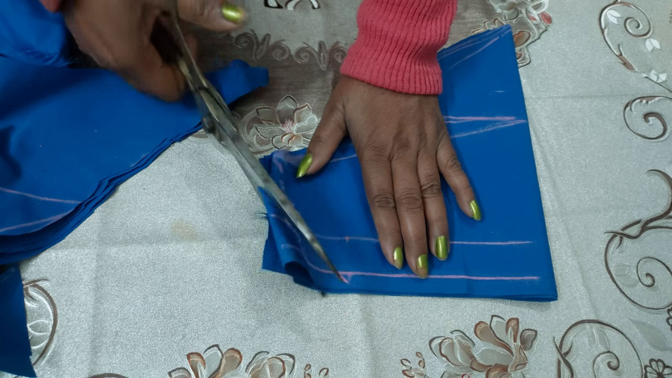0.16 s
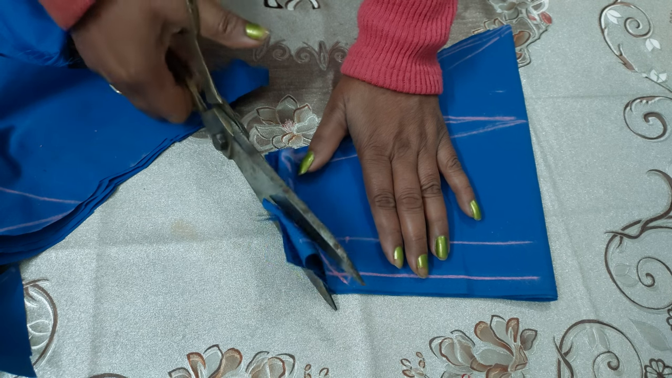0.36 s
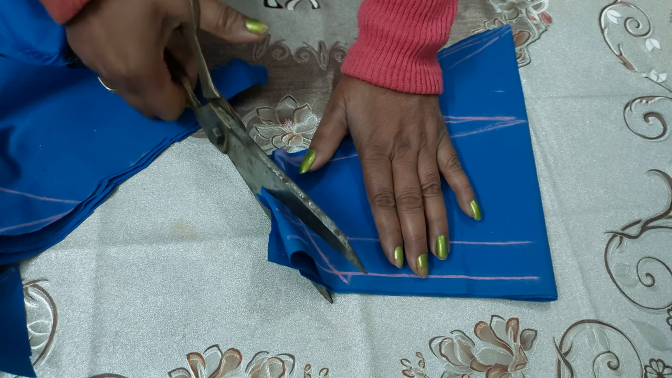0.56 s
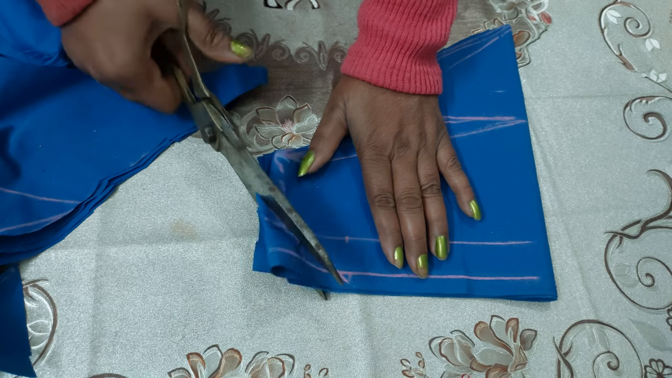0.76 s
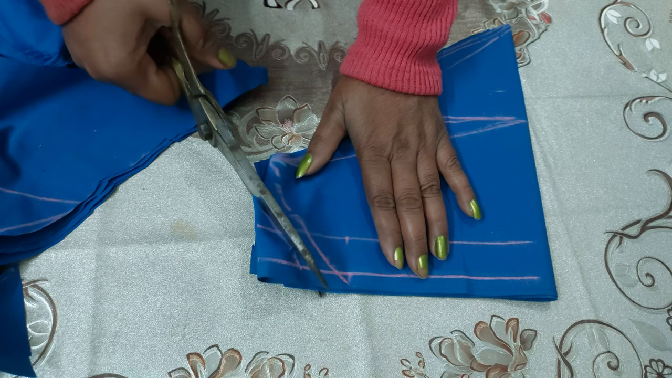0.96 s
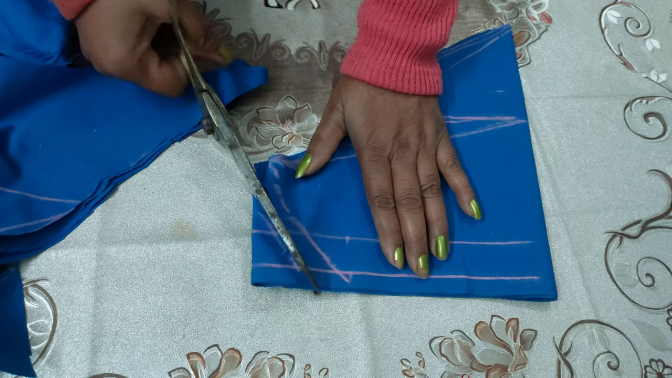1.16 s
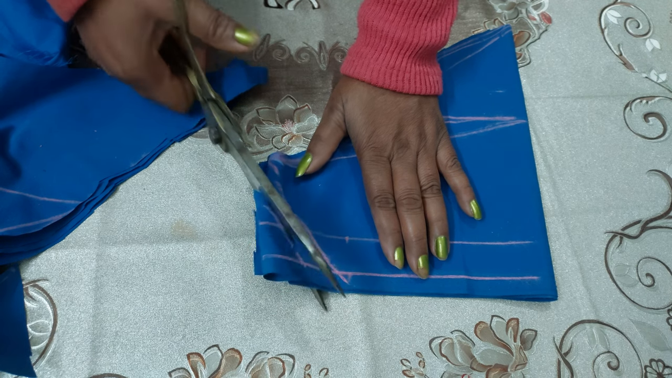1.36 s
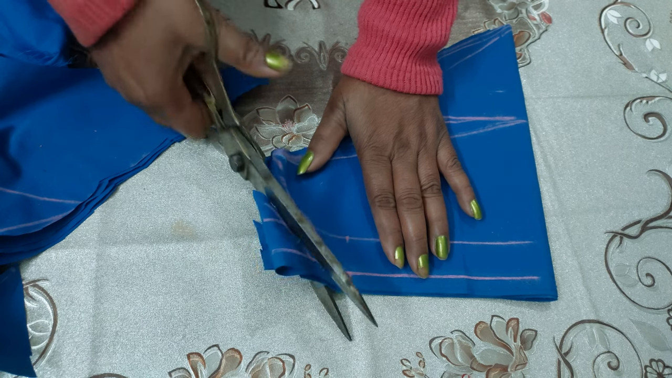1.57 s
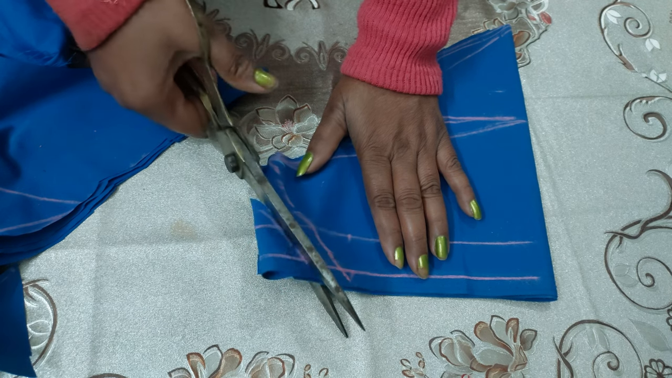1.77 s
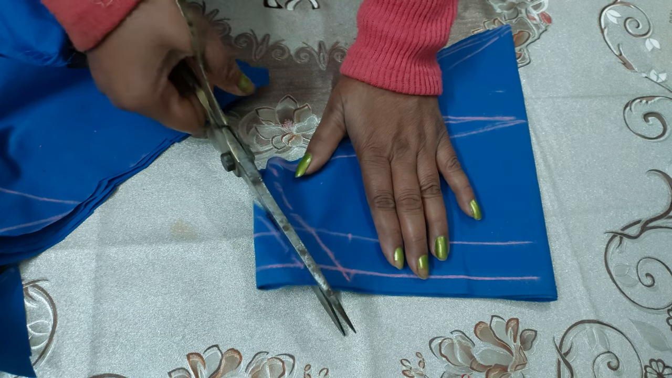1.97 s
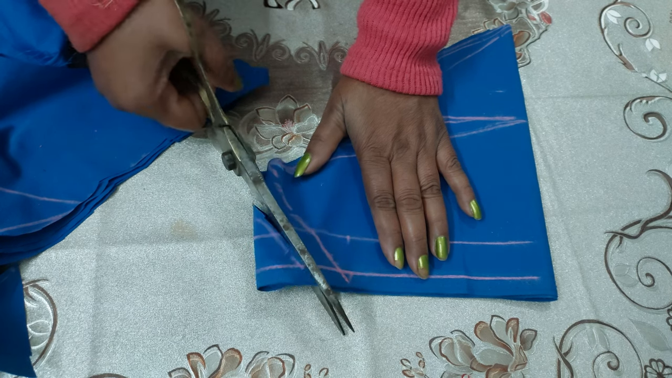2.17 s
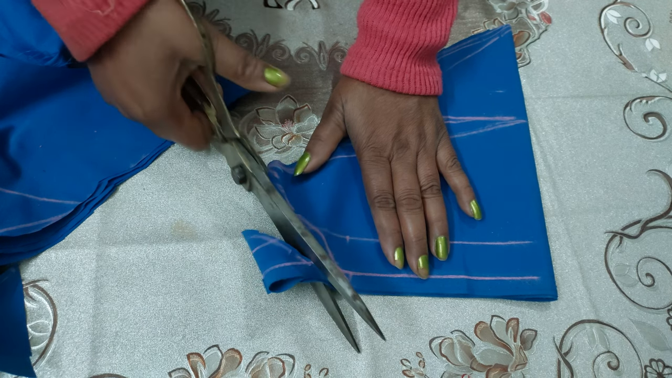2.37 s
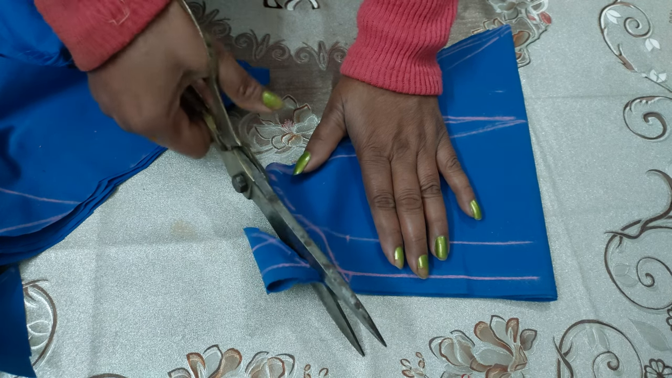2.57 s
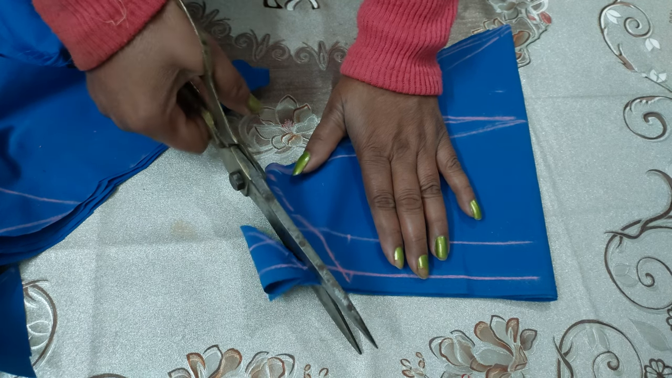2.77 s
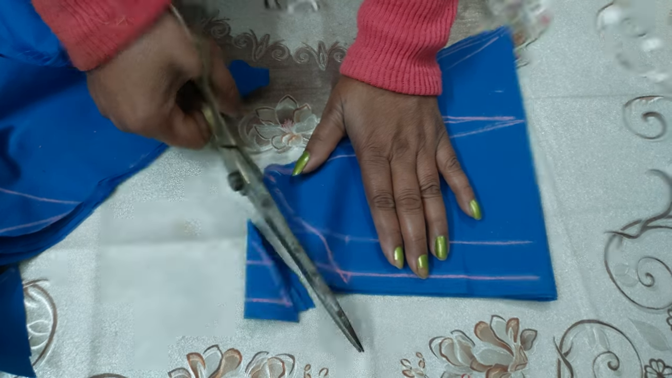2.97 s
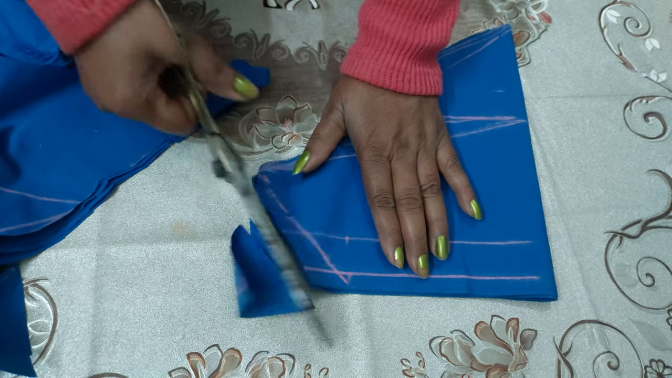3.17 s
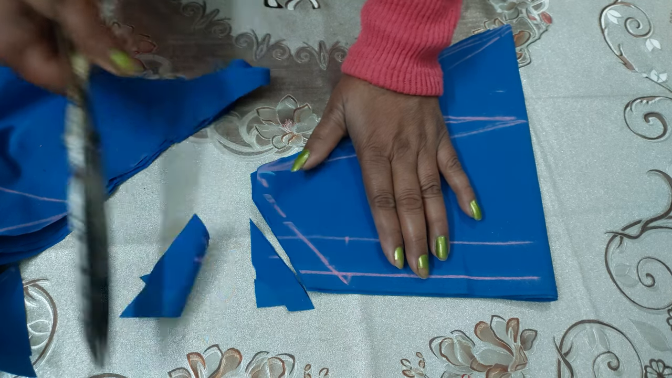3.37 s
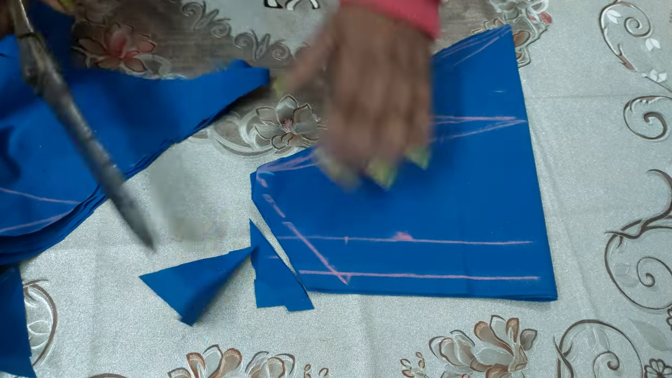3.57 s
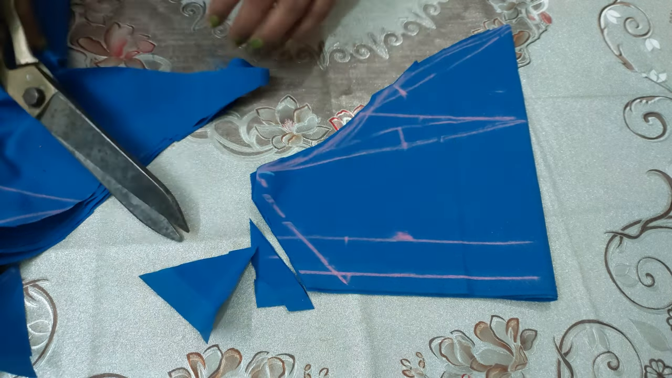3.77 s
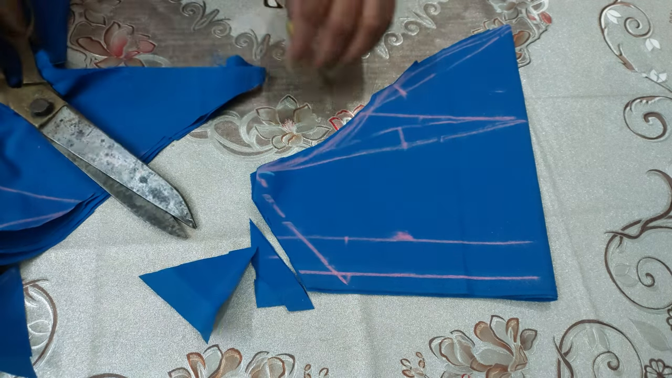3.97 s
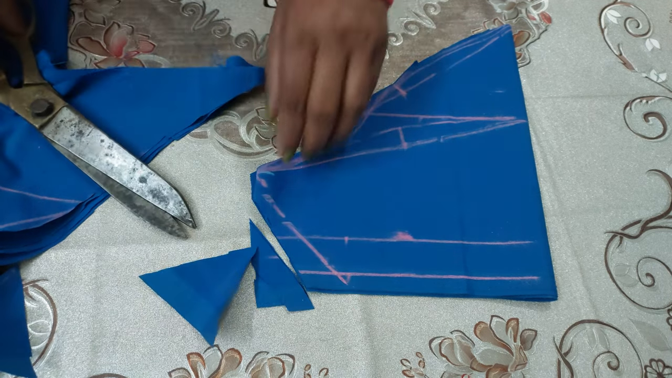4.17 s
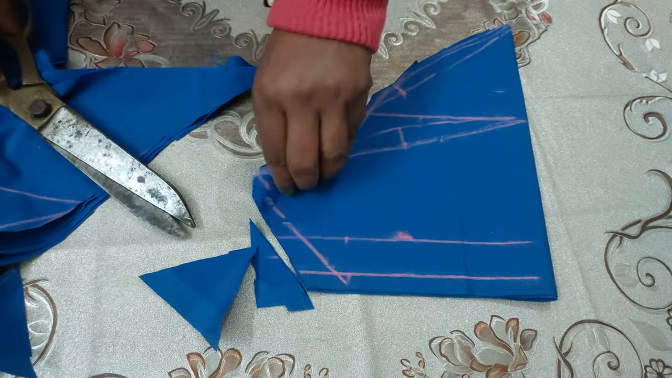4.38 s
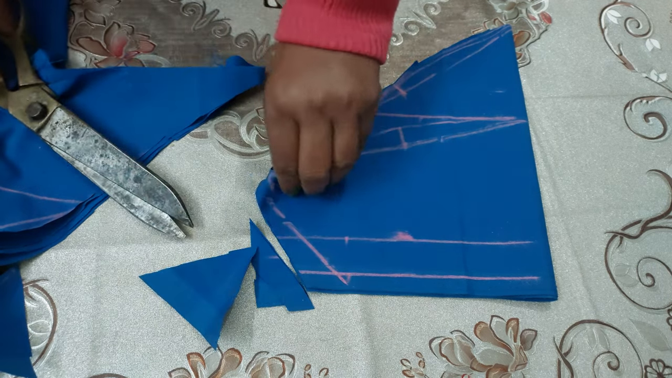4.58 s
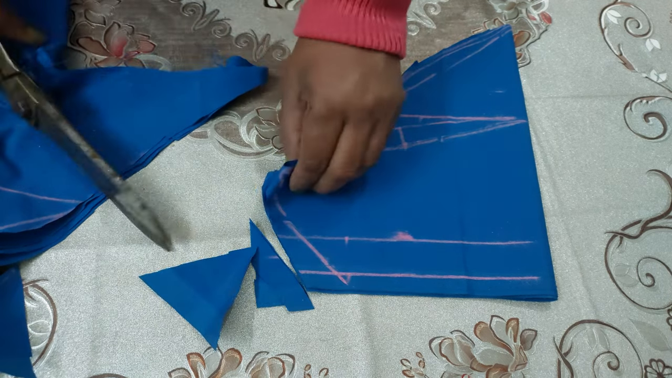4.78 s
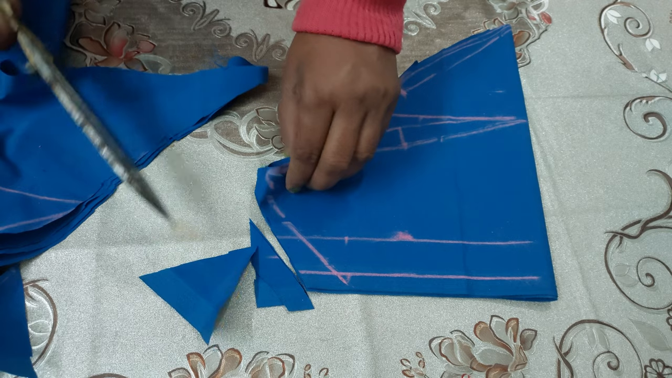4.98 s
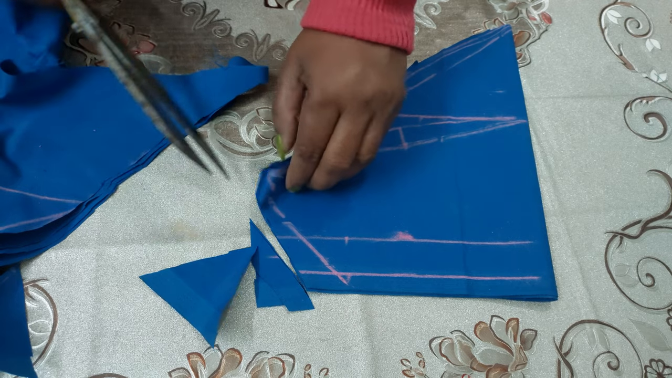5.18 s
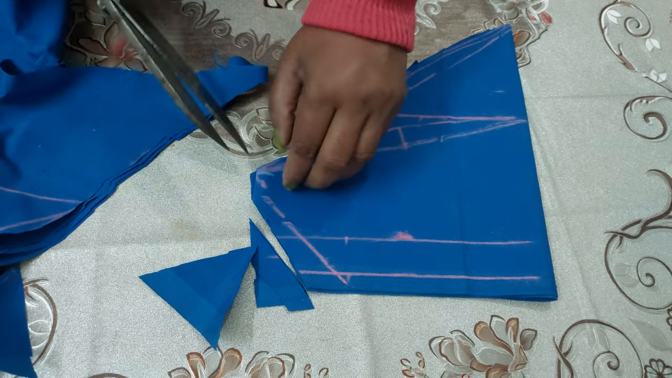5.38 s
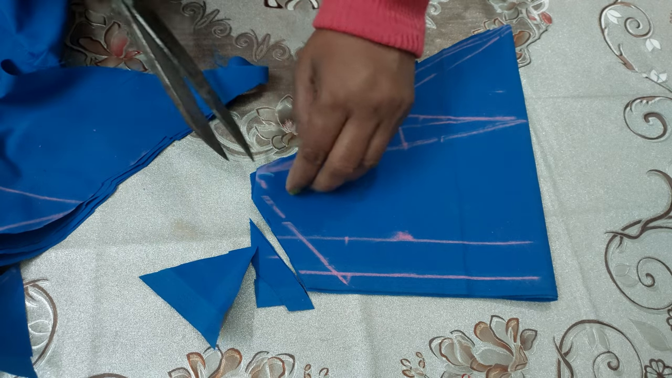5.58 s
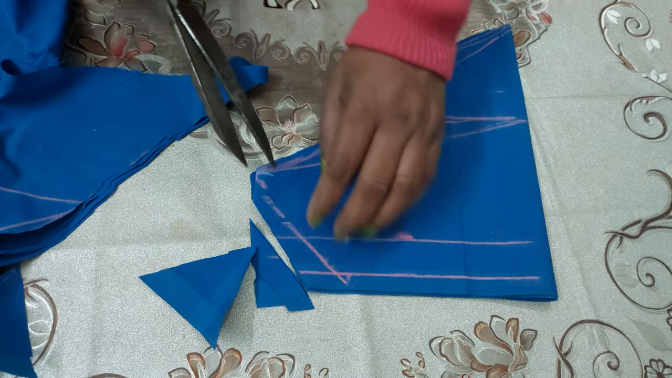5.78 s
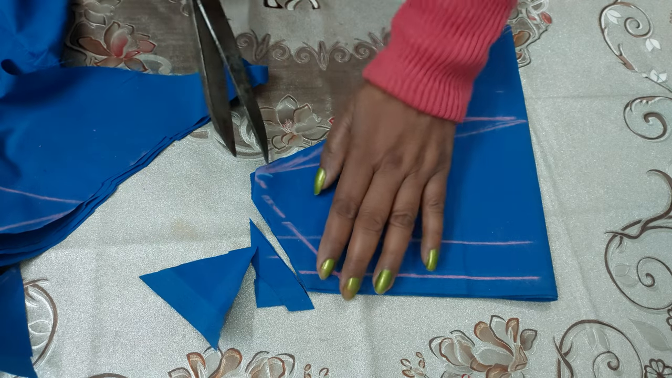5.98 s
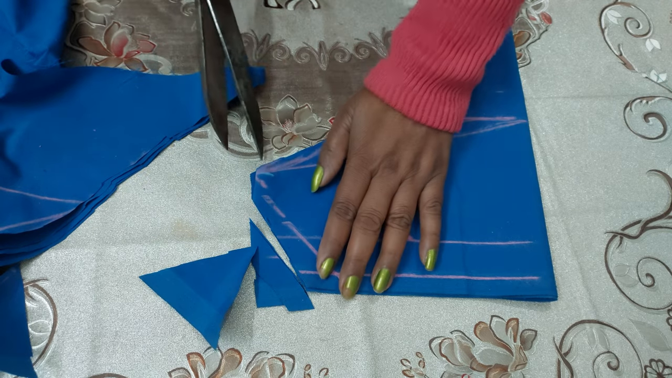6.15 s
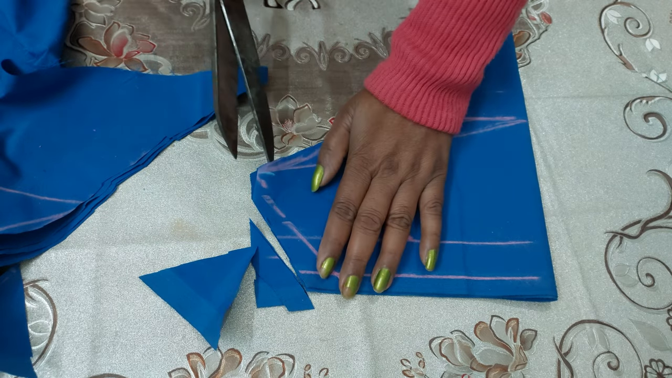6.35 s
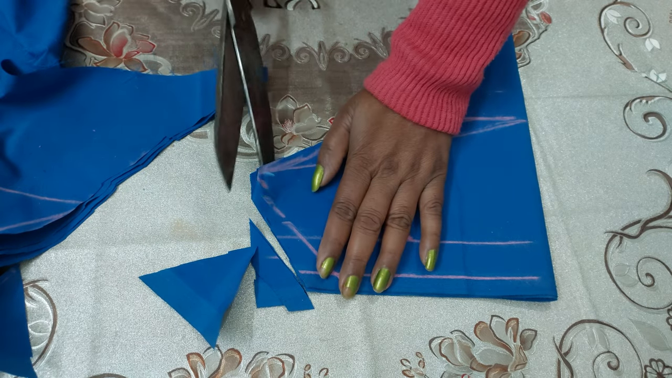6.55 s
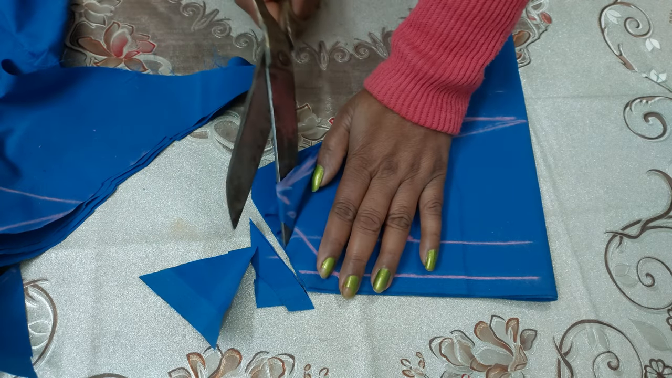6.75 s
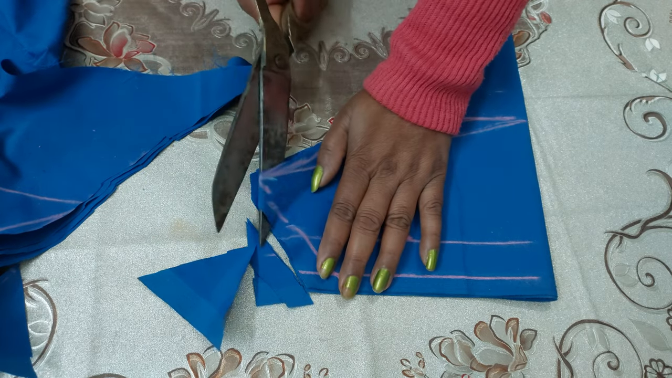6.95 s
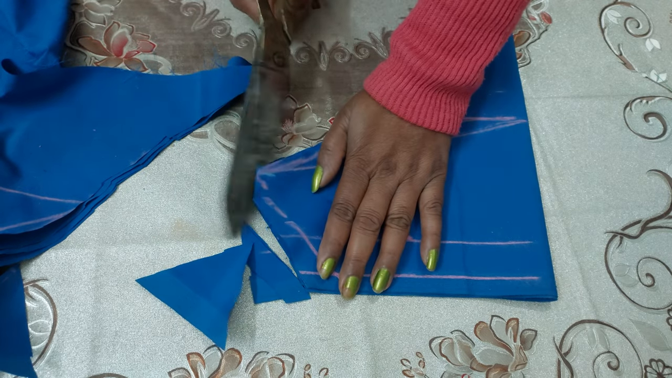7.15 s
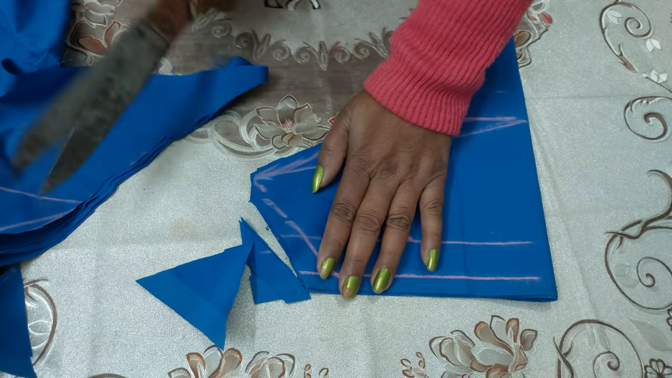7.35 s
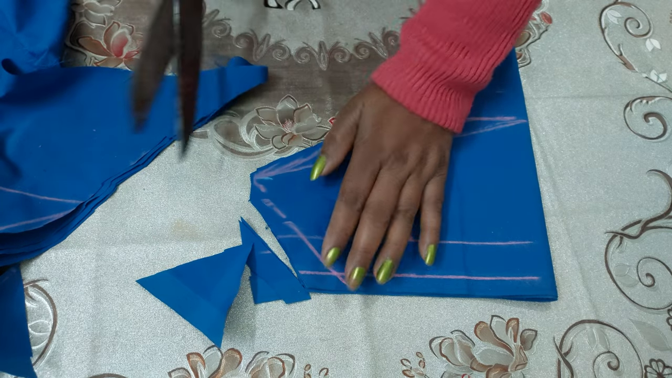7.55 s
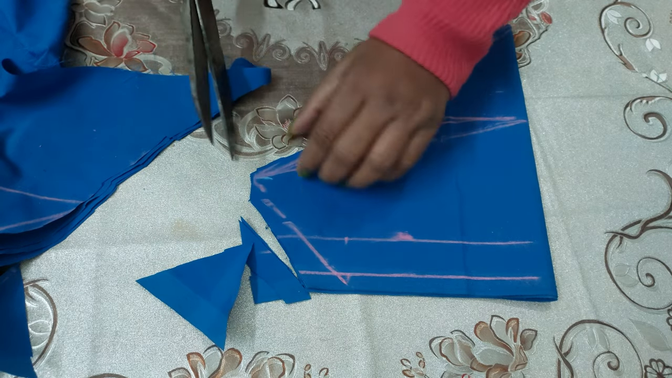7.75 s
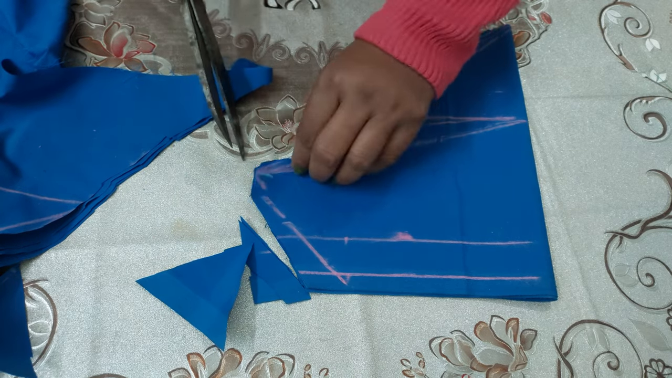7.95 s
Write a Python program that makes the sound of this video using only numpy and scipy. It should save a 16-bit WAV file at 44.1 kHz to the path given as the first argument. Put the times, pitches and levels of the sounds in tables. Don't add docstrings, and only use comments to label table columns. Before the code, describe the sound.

Close-up fabric cutting: gritty blade scrapes and low table thumps, one loud closing snap, a set-down knock, then quiet cloth slides and small steel ticks.

```python
import sys
import numpy as np
from scipy import signal
from scipy.fft import rfft, irfft, next_fast_len
from scipy.io import wavfile
from scipy.ndimage import uniform_filter1d, map_coordinates

SR = 44100
rng = np.random.default_rng(int(sys.argv[2]) if len(sys.argv) > 2 else 0)


def materialize(psi):
    bounded = np.clip(np.atleast_2d(psi).T, -1, 1)
    quanta = np.round(bounded * 32767).astype(np.int16)
    wavfile.write(sys.argv[1], SR, quanta)


def ratio_of_db(decibels):
    return 10 ** (np.asarray(decibels, float) / 20)


N = 353682

# frequency in [Hz], level in [dB per Hz].
HUM_HZ_DB = [(15, -65), (25, -27), (92, -10.5), (127, -13.5), (153, -6.5), (223, -9), (263, -1.5),
             (317, -11.5), (531, -10), (695, -13), (1740, -20.5), (2690, -37.5), (10400, -49.5),
             (12900, -46), (16000, -46)]
# frequency in [Hz], correlation [-1 to 1].
ALIKE_HZ = [(60, 0.82), (180, 0.92), (550, 0.58), (1650, -0.19), (4970, -0.46), (15000, -0.14)]
# frequency in [Hz], t60 in [s].
ROOM_HZ_T60_S = [(100, 0.65), (1000, 0.54), (5000, 0.41), (14000, 0.19)]
# frequency in [Hz], level in [dB], t60 in [s], excitation group [0-4, rounded].
TABLE_MODES = [(90.2, 2.5, 0.3, 4), (104.4, 3, 0.31, 0.5), (159.7, 1, 0.33, 1), (202, 2, 0.22, 2.2),
               (275.8, 7.5, 0.13, 2), (300, 10.5, 0.15, 2), (319, 2.5, 0.036, 2), (412, -10, 0.21, 2),
               (510, -16, 0.17, 3), (634, 2, 0.096, 3), (685, -5, 0.083, 3), (826, -13, 0.076, 2.2),
               (1012, -24, 0.022, 3.9), (1145, -4.5, 0.051, 3), (1281, -18, 0.12, 3), (1470, -18, 0.012, 1),
               (1773, -20.5, 0.088, 3)]
# frequency in [Hz], width in [Hz], level in [dB].
BLADE_MODES = [(3000, 300, -0.5), (3560, 220, 11), (3720, 480, -1), (5500, 130, -5), (6700, 55, -29),
               (7100, 420, -26), (7190, 76, 4.5), (10500, 120, -10.5), (11400, 160, -1), (12560, 700, 9.5),
               (14300, 840, -2)]
# frequency in [Hz], width in [Hz], level in [dB].
SING_BANDS = [(3500, 720, -1), (5600, 600, -2.5), (7550, 510, 0.5)]
# frequency in [Hz], level in [dB per Hz].
CLOTH_HZ_DB = [(880, -22.5), (1500, -29), (1790, -8), (2560, -15), (3520, -25.5), (4120, -20),
               (5440, -13.5), (8490, -20), (11200, -17.5), (16000, -23)]
# start in [s], length in [s], effort in [dB], bite into thread in [dB],
# weight on the table in [dB].
STROKES = [(0.0, 0.12, -66, -3.5, 22.5), (.11, 0.15, -64, 0.5, 21.5), (.69, 0.081, -71.5, -2, 29.5),
           (1.008, 0.09, -50, -1, 21), (1.3, 0.096, -63, -9, 20), (1.38, 0.17, -58.5, -9.5, 13),
           (1.6, 0.35, -67.5, -10, 26), (1.84, 0.032, -58.5, -7, 26), (1.985, 0.093, -59, -5, 29.5),
           (2.284, 0.033, -62, -12, 19), (2.36, 0.12, -70.5, -7, 19.5), (2.51, 0.32, -70.5, -8, 26),
           (2.7, 0.14, -63.5, -13, 28.5), (2.957, 0.012, -50, 1.5, 26.5), (3.1, 0.19, -69.5, -7.5, -1)]
# start in [s], length in [s], speed in [dB], crispness in [dB],
# weight on the table in [dB].
SLIDES = [(.25, 0.34, -76, -13, 24.5), (.58, 0.14, -78, -10.5, 30.5), (.77, 0.32, -65, -10.5, 25.5),
          (.86, 0.16, -55, -3, 22.5), (3.3, 0.27, -69.5, -8.5, 2), (3.55, 0.38, -70.5, -0.5, -9),
          (3.75, 0.29, -65.5, -4, 18.5), (4.1, 0.33, -73, -11, -2), (4.27, 0.27, -65, -10, 20.5),
          (4.65, 0.39, -67, -5, 15), (4.79, 0.1, -62.5, -3, 16), (5.05, 0.15, -65, -9, 8.5),
          (5.5, 0.84, -66.5, -6.5, 13.5), (6.49, 0.48, -64, -7, 13.5), (6.62, 0.19, -67, 4, 7),
          (6.78, 0.13, -64, 2.5, -6), (6.9, 0.22, -65.5, -10, 11.5), (7.12, 0.2, -59.5, -5, 10.5),
          (7.37, 0.33, -72, -6, 15), (7.8, 0.33, -65, -11, 17)]
# start in [s], peak in [dB], place toward the middle in [dB],
# hardness in [dB].
BUMPS = [(0.017, -34, 1, -5.5), (0.038, -24, -12, -10), (0.105, -35, -9, -2), (0.154, -16, -16, -10),
         (0.632, -37, -14, -17), (0.673, -29, -9, -10), (0.717, -33, -5, -1), (0.896, -26.5, -3.5, -6),
         (0.997, -28.5, -19, -1), (1.066, -22.5, -6, 0), (1.081, -17.5, -15, -9), (1.106, -23.5, -8, 3.5),
         (1.308, -30, -17, -2), (1.328, -23, -17, -25), (1.394, -41.5, -10, 5), (1.425, -19, -22, -16),
         (1.683, -26.5, -13, -14), (1.841, -17.5, -10, -12), (1.861, -22.5, -4, -7),
         (1.987, -16, -18, -11.5), (2.026, -17, -7, -7.5), (2.13, -25.5, -1.5, -7.5), (2.267, -38, 2, -16),
         (2.516, -19.5, -5, -25.5), (2.708, -29.5, 5, -9), (2.818, -27.5, 7, -9), (2.959, -26, 6.5, -1),
         (2.9725, -10.5, -1, -6.5)]
# start in [s], peak in [dB], place in [dB], hardness in [dB],
# freedom to ring [x t60].
SLAMS = [(2.9842, -9.5, 2.5, -13.5, 0.48), (3.7478, -15.5, -12.5, -3, 1.4), (4.3, -20, -14, -11.5, 1.3),
         (4.785, -34.5, -18, -13, 2.1), (6.361, -38.5, -9, -8, 1.2), (6.537, -27, -21, -17.5, 1.3),
         (7.097, -39.5, -14, -18.5, 2.2), (7.904, -41.5, -1, -3, 1.9)]
# start in [s], peak in [dB], brightness in [dB], swell in [s].
RUBS = [(0.032, -54.5, -21, 0.022), (0.1104, -37, -13, 0.0076), (0.696, -47.5, 3.5, 0.011),
        (0.713, -50, -12, 0.012), (1.376, -42.5, -18, 0.012), (1.6786, -44.5, -6.5, 0.0096),
        (2.287, -58, -15, 0.0058), (2.545, -52, -20, 0.004), (2.5765, -45, -10, 0.0051)]
# start in [s], peak in [dB], brightness in [dB], ring in [Hz].
BITES = [(0.6747, -50.5, -12, 7700), (0.738, -50, -13, 7650), (1.03, -40.5, -6, 5600),
         (1.121, -35, -18, 5500), (1.886, -51, -9, 3500), (2.005, -41, -15, 5200), (0.856, -49, -25, 2960),
         (0.889, -39.5, -7, 5600), (0.9294, -46, -13.5, 3500), (0.9624, -42, -14, 3080),
         (0.9986, -46, -5, 3540), (1.0143, -35.5, -7, 3500), (1.065, -37, -1, 5500),
         (1.105, -34, -11, 5600), (1.3084, -57, -22, 7500), (1.321, -54, -22, 5800),
         (1.4744, -49, -4, 4800), (1.656, -49.5, -3.5, 5470), (1.839, -38, -8, 3570),
         (1.838, -43, -10, 6000), (1.988, -41, -10, 5200), (2.078, -44, -10, 7500), (2.112, -44, -10, 6400),
         (1.862, -42, -3, 3470), (1.988, -33, -9, 3470), (2.0145, -40, -8, 3740), (2.0256, -36.5, -4, 3560),
         (2.0448, -35.5, -12, 3500), (2.075, -37, -14, 3100), (2.111, -41, -3, 3500),
         (2.127, -47, -6, 3450), (2.708, -46, -6, 3400), (2.762, -39, -6, 3470), (2.815, -42.5, -4, 3400),
         (2.834, -33.5, -12, 3000)]
# start in [s], peak in [dB], brightness in [dB], ring in [Hz],
# swell in [s].
SNAP = [
    (2.956, -36.5, -30, 5500, 0.0062),
    (2.966, -25, -5, 14900, 0.0024),
    (2.9757, -28.5, -11, 8000, 0.0011),
    (2.9796, -22, -6, 4230, 0.0009),
]
# start in [s], peak in [dB], brightness in [dB], ring in [Hz], swell in [s].
CLINKS = [(3.3527, -48, -22, 3550, 0.0016), (3.7474, -48, -16, 3680, 0.0018),
          (4.296, -45, -26, 6400, 0.0013), (4.847, -49, 0, 5500, 0.0017), (5.1, -46, -7, 3530, 0.0053),
          (5.097, -39, -15, 7300, 0.0055), (7.4688, -44, -14, 7300, 0.0008),
          (7.474, -36, -12, 7400, 0.0046), (6.959, -53, -25, 3720, 0.0075),
          (7.185, -35, -6.5, 12700, 0.0044), (7.2073, -29, -11, 5680, 0.0032),
          (7.392, -30.5, -13, 5370, 0.0035), (7.391, -46, 5, 9850, 0.002), (7.398, -41, -8, 6900, 0.0057),
          (7.486, -39, -27, 3610, 0.0014), (7.522, -58, 4, 13900, 0.0027)]
# start in [s], peak in [dB], ring in [Hz].
CRUNCHES = [(0.106, -27.5, 630), (0.153, -27, 686), (0.651, -37, 581), (0.693, -52, 700), (0.715, -32, 610),
            (0.84, -34, 684), (0.862, -28, 552), (0.883, -28, 641), (0.899, -34, 519), (0.912, -35, 530),
            (0.959, -34, 710), (0.997, -26, 536), (1.029, -21, 950), (1.067, -21, 666), (1.084, -22, 674),
            (1.109, -17.5, 650), (1.124, -22, 630), (1.149, -32, 616), (1.189, -32, 690), (1.317, -37, 670),
            (1.394, -27, 665), (1.458, -35, 550), (1.483, -39, 630), (1.53, -42, 649), (1.681, -49, 684),
            (1.723, -37, 692), (1.772, -31, 592), (1.838, -31, 649), (1.862, -30, 646), (1.932, -40, 641),
            (1.988, -21, 635), (2.027, -23, 606), (2.046, -25, 1060), (2.08, -28, 684), (2.104, -27, 665),
            (2.128, -30, 681), (2.171, -37, 606), (2.269, -32, 646), (2.577, -33, 673), (2.617, -30, 697),
            (2.708, -28.5, 1270), (2.76, -24.5, 660), (2.791, -28, 666), (2.815, -21.5, 664),
            (2.834, -21, 668), (2.96, -19, 670), (2.967, -24, 610), (2.979, -11.5, 670),
            (3.747, -15.5, 510), (3.761, -20.5, 570)]
# start in [s], peak in [dB], frequency in [Hz], t60 in [s].
KNOCKS = [(0.154, -24, 290, .06), (0.673, -31, 314, .06), (0.7135, -26.5, 650, 0.046),
          (0.719, -28, 308, 0.075), (0.896, -31, 336, 0.04), (0.997, -20, 316, .05), (1.064, -23, 392, .05),
          (1.104, -19.5, 327, .06), (2.026, -22, 323, 0.079), (2.07, -31.5, 290.6, 0.14),
          (2.978, -15.5, 1247, 0.027), (2.9815, -9, 130, .03), (3.748, -26, 1190, 0.029),
          (3.76, -37, 1043, .05), (4.299, -29.5, 320, .05), (4.335, -30, 282, 0.25),
          (4.385, -39, 270, 0.18), (3.765, -27, 590, .07), (3.804, -30.5, 660, .07), (3.857, -35, 600, .09),
          (3.8, -36, 290, .3)]
# start in [s], peak in [dB], frequency in [Hz], t60 in [s].
RINGS = [(5.099, -56, 7400, .2), (7.21, -56, 5600, .4), (7.393, -56, 5500, .15), (7.3925, -50, 10000, .03),
         (7.476, -56, 7400, .1), (7.487, -53, 3600, .05), (7.522, -57, 13900, .08)]
# start in [s], length in [s], frequency in [Hz], width in [Hz], level in [dB].
SQUEAKS = [(5.676, .1, 6700, 300, -69), (5.68, 0.077, 10600, 600, -68), (5.722, 0.074, 7720, 120, -61.5),
           (5.796, 0.12, 6600, 120, -63.5), (5.798, 0.077, 10500, 150, -59.5),
           (5.819, 0.12, 7100, 120, -66.5), (7.143, 0.081, 12600, 890, -45.5),
           (7.174, 0.047, 2240, 300, -53), (2.984, 0.06, 4300, 2600, -47), (2.985, 0.17, 3900, 2800, -54),
           (2.278, 0.045, 2000, 400, -58), (4.4, 0.05, 1800, 700, -62)]
# start in [s], level in [dB], frequency in [Hz], t60 in [s].
SHUT = (3, -34.5, 1290, 0.16)
# start in [s], length in [s], level in [dB].
PUFFS = [(4.767, 0.14, -48.5), (5.948, 0.34, -56), (6.298, 0.41, -44), (6.725, 0.1, -52), (7.89, 0.11, -56)]

AWAY_S = 3.3
SNAP_S = SNAP[0][0] - 0.01


def unit(x):
    return x / np.sqrt(np.mean(x ** 2) + 1e-20)


def along(points, hz):
    f, v = np.transpose(points)
    return np.interp(np.log(hz + 1), np.log(f + 1), v)


def wobble(rate_hz):
    knots = rng.standard_normal(int(N * rate_hz / SR) + 4)
    return map_coordinates(knots, [np.arange(N) * rate_hz / SR])


def filtered(x, response):
    m = next_fast_len(N + SR // 2)
    return irfft(rfft(x, m) * response(np.fft.rfftfreq(m, 1 / SR)), m)[..., :N]


def resonances(modes):
    def response(f):
        return sum((-1) ** k * ratio_of_db(db) * 1j * f * width / (hz * hz - f * f + 1j * f * width)
                   for k, (hz, width, db) in enumerate(modes))
    return response


def below_treble(hz):
    return 1 / (1 + (hz / 8800) ** 12)


def unlike(pair):
    def mid_side(hz):
        turn = np.arccos(np.clip(along(ALIKE_HZ, hz), -1, 1)) / 2
        return np.array([np.cos(turn), np.sin(turn)])
    mid, side = filtered(pair, mid_side)
    return np.array([mid + side, mid - side])


def slips(rate_hz, depth_db):
    return unit(ratio_of_db(depth_db * wobble(rate_hz)) * rng.standard_normal(N))


def hum():
    z = signal.stft(rng.standard_normal((2, N)), nperseg=512)[2]
    patches = uniform_filter1d(rng.standard_normal(z.shape[1:]), size=6, axis=0)
    patches = uniform_filter1d(patches, size=14, axis=1)
    pair = signal.istft(z * ratio_of_db(1.67 * unit(patches)), nperseg=512)[1][:, :N]
    return ratio_of_db(-49.5) * unit(filtered(unlike(pair), lambda hz: ratio_of_db(along(HUM_HZ_DB, hz))))


def stroke_shape(t, length_s):
    bite_s, push_db, let_go_db_per_s = 0.0066, -0.5, 202
    squeeze_db = push_db * (np.clip(t / length_s, 0, 1) - 1.5)
    fall_db = let_go_db_per_s * np.maximum(t - length_s, 0)
    return np.clip(t / bite_s, 0, 1) * ratio_of_db(squeeze_db - fall_db)


def slide_shape(t, length_s):
    return np.abs(np.sin(np.pi * np.clip(t / length_s, 0, 1))) ** 0.69


def efforts():
    t, power = np.arange(0, N, 32) / SR, 0
    for rows, shape in (STROKES, stroke_shape), (SLIDES, slide_shape):
        for s, length_s, db, crisp_db, weight_db in rows:
            gains = ratio_of_db([[db], [db + crisp_db], [db + weight_db]])
            power = power + (shape(t - s, length_s) * gains) ** 2
    return [np.interp(np.arange(N) / SR, t, np.sqrt(p)) for p in power]


def strokes():
    speed, bite, weight = efforts()
    cutting = np.arange(N) < AWAY_S * SR
    jerk = np.where(cutting, 1, 0.3)
    catch = ratio_of_db(jerk * (2.1 * wobble(40.055) + 1.1 * wobble(130)))

    def low_modes(f):
        return resonances([(92, 34, 0)])(f) ** 2 + resonances([(162, 14, -15)])(f)

    wood_modes = [(hz, 2.67 / t60_s, db) for hz, db, t60_s, group in TABLE_MODES]

    def upper_modes(f):
        return (resonances(wood_modes[2:])(f) + 0.18 / (1 + (f / 1800) ** 4)) * f / (f + 300)

    boom = unit(filtered(slips(28, depth_db=0.5), low_modes))
    rattle = unit(filtered(catch * slips(90, depth_db=1.6), upper_modes))
    wood = weight * (ratio_of_db(0.4) * boom + ratio_of_db(-4) * rattle)

    def steel(f):
        return ratio_of_db(along(CLOTH_HZ_DB, f)) * (1.1 + resonances(BLADE_MODES)(f))

    scrape = unit(filtered(catch * slips(300, depth_db=0.5), lambda f: steel(f) * below_treble(f)))
    hiss_slips = catch * slips(340, depth_db=3.8 * jerk)
    hiss = unit(filtered(hiss_slips, lambda f: steel(f) * (1 - below_treble(f))))
    bands = filtered(catch * slips(200, depth_db=1.5),
                     lambda f: np.array([resonances([band])(f) ** 2 for band in SING_BANDS]))
    sing = cutting * unit(sum(ratio_of_db(8.0 * wobble(30.07)) * band for band in bands))
    scrape_gain = np.where(cutting, ratio_of_db(-0.5), 1)
    return wood, speed * (scrape_gain * scrape + ratio_of_db(-5.5) * sing) + bite * hiss


def room(x):
    hz, t, z = signal.stft(rng.standard_normal((2, SR // 2)), SR, nperseg=256)
    decay = ratio_of_db(-60 * t / along(ROOM_HZ_T60_S, hz)[:, None])
    tail = signal.istft(z * decay, SR, nperseg=256)[1]
    tail = tail / np.linalg.norm(tail[0])
    delayed = np.pad(x, (480, 0))[None]
    return unlike(signal.fftconvolve(delayed, tail, axes=1)[:, :N])


def bumps():
    out, t = np.zeros(N + SR), np.arange(SR // 2) / SR
    dull = signal.butter(4, [400, 1600], "bandpass", fs=SR, output="sos")
    # freedom x, thud dB, lowest-mode favour dB; a pressing hand damps the strokes
    rows = [(*row, 0.8, -10.5, 0) for row in BUMPS] + [(*row, 0, 3.5) for row in SLAMS]
    lucks = rng.standard_normal((len(rows), len(TABLE_MODES)))
    for (s, db, place_db, hard_db, free, thud_db, low_db), luck in zip(rows, lucks):
        knock_db = 1.48 * hard_db - 2.5
        group_db = [-low_db, place_db, hard_db - 9.0, knock_db - 6.5, 0.26 * place_db + 4 + low_db]
        ring = 0
        for (hz, level_db, t60_s, group), c in zip(TABLE_MODES, luck):
            decay_s = t60_s * (free if hz < 240 else min(free, 0.9))
            build = 1 - np.exp(-t * hz / 0.19)
            level = ratio_of_db(level_db + group_db[round(group)] + c - 60 * t / decay_s)
            ring = ring + level * np.sin(2 * np.pi * hz * (1 + c / 150) * t) * build
        cycles, thud_cycles = t * max(480 * ratio_of_db(0.93 * hard_db), 90), 0.56
        push = cycles / thud_cycles * np.exp(1 - cycles / thud_cycles)
        thud = ratio_of_db(thud_db) * np.sin(2 * np.pi * cycles) * push
        fading = ratio_of_db(8.5 - 60 * t / 0.013) + ratio_of_db(thud_db - 17 - 60 * t / 0.06)
        fading = fading + ratio_of_db(thud_db - 26 - 60 * t / 0.3)
        knock = ratio_of_db(knock_db) * fading * signal.sosfilt(dull, rng.standard_normal(len(t)))
        out[round(s * SR):][:len(t)] -= ratio_of_db(db - 1.5) * (ring + knock + thud)
    return out[:N]


def ticks():
    out, t = np.zeros(N + SR), np.arange(SR // 5) / SR
    f = np.fft.rfftfreq(len(t), 1 / SR)
    split = below_treble(f)
    rub_hz, edge_hz, bite_swell_s = 5600, 7300, 0.003
    rows = [(*row, bite_swell_s) for row in BITES]
    rows += [(s, db, bright_db, rub_hz, swell_s) for s, db, bright_db, swell_s in RUBS]
    for s, db, bright_db, ring_hz, swell_s in rows + SNAP + CLINKS:
        u = t / max(swell_s, 0.0003)
        shape = u * np.exp(1 - u)
        grit = shape * rng.standard_normal(len(t)) * ratio_of_db(3 * rng.standard_normal(len(t)))
        grit = 1.27 * unit(grit) * np.sqrt(np.mean(shape ** 2))
        snapped = s > SNAP_S
        modes = [(hz, width_hz, level_db + rng.normal(-19, 2) - 9 * snapped)
                 for hz, width_hz, level_db in BLADE_MODES]
        free_db = 4.5 if s > AWAY_S else -6
        edge_db = -10 if 4000 < ring_hz < 5000 or ring_hz > 9000 else 4.4
        edge_db += 20 * np.log10(min(1, swell_s / 0.0052))
        cluster = [(ring_hz, 180 + 0.54 / swell_s, 5), (0.86 * ring_hz, 90, free_db - 2),
                   (1.05 * ring_hz, 110, free_db - 3.5), (ring_hz, 70, free_db), (edge_hz, 350, edge_db)]
        fuzzy_ring = sum(resonances([mode])(f) for mode in cluster)
        colour = 0.16 * min(2.5, 0.0043 / swell_s) + resonances(modes)(f)
        colour = colour + (0.45 if snapped else 0.7) * fuzzy_ring
        colour = colour * (split + ratio_of_db(bright_db + 8.0) * (1 - split))
        low_cut_hz = 1000 if db > -20 else 2000
        colour = colour / (1 + (low_cut_hz / (f + 1)) ** 4)
        out[round(s * SR):][:len(t)] += ratio_of_db(db - 1.0) * irfft(rfft(grit) * colour, len(t))
    return out[:N]


def crunches():
    out, t = np.zeros(N + SR), np.arange(SR // 10) / SR
    f, u = np.fft.rfftfreq(len(t), 1 / SR), t / 0.0026
    for s, db, hz in CRUNCHES:
        grit = u * np.exp(1 - u) * rng.standard_normal(len(t))
        colour = resonances([(hz, 138, 8), (1250, 1400, -1.5)])(f) * resonances([(900, 1510, 0)])(f) ** 3
        burst = irfft(rfft(grit) * colour, len(t))
        out[round((s - 0.001) * SR):][:len(t)] += ratio_of_db(db - 6.5) * burst / np.abs(burst).max()
    return out[:N]


def knocks(rows, waver_rad):
    out, t = np.zeros(N + SR), np.arange(SR // 3) / SR
    waver = np.pad(waver_rad * wobble(60), (0, SR))
    for s, db, hz, t60_s in rows:
        at = round(s * SR)
        turn = waver[at:][:len(t)] - waver[at]
        rise = 1 - np.exp(-t * hz / 0.64)
        out[at:][:len(t)] -= ratio_of_db(db - 60 * t / t60_s) * rise * np.sin(2 * np.pi * hz * t + turn)
    return out[:N]


def squeaks():
    out, t = np.zeros(N), np.arange(N) / SR
    for s, length_s, hz, width_hz, db in SQUEAKS:
        swell = np.clip((t - s) / 0.014, 0, 1) * np.clip((s + length_s - t) / (0.5 * length_s), 0, 1)
        whistle = filtered(slips(70, depth_db=-3.0), resonances([(hz, width_hz, 0)]))
        out += ratio_of_db(db) * swell * unit(whistle)
    return out


def shut_hum():
    s, db, hz, t60_s = SHUT
    after = np.maximum(np.arange(N) / SR - s, 0)
    level = ratio_of_db(db - 60 * after / t60_s + 5.4 * wobble(90))
    return level * np.sin(2 * np.pi * hz * after + 1.1 * wobble(70)) * (after > 0)


def puffs():
    t = np.arange(N) / SR
    gust = sum(ratio_of_db(db) * np.sin(np.pi * np.clip((t - s) / length_s, 0, 1)) for s, length_s, db in PUFFS)
    air = unit(filtered(rng.standard_normal((2, N)), resonances([(45, 5.6, 0)])))
    return gust * air * ratio_of_db([[-4], [3]])


def lag(hz, s):
    return np.exp(-2j * np.pi * hz * np.array([[s], [-s]]))


def bounce(hz):
    return 1 + 0.12 * np.exp(-2j * np.pi * hz * np.array([[0.00018], [0.00027]]))


def scene():
    wood, steel = strokes()
    wood = wood + bumps() + crunches() + shut_hum() + knocks(KNOCKS, waver_rad=1.3)
    wood = filtered(wood, lambda hz: (1j * hz / (65 + 1j * hz)) ** 4)
    steel = steel + squeaks() + ticks() + knocks(RINGS, waver_rad=2.4)
    cutting = np.arange(N) < AWAY_S * SR
    top = filtered(wood, lambda hz: lag(hz, -0.000065))
    near = filtered(cutting * steel * ratio_of_db([[1.2], [-1.8]]), lambda hz: bounce(hz) * lag(hz, -0.000011))
    away = filtered(~cutting * steel * ratio_of_db([[-2.5], [1.5]]), lambda hz: bounce(hz) * lag(hz, 0.000011))
    walls = ratio_of_db(-4.0) * room(filtered(wood, lambda hz: (hz / (hz + 100)) ** 2)) + ratio_of_db(-4.5) * room(steel)
    return top + near + away + walls + hum() + puffs()


def top_cut(x):
    return signal.sosfilt(signal.butter(12, 16990, fs=SR, output="sos"), x)


def record(dry):
    top_hz = 15870
    return top_cut(filtered(dry, lambda hz: hz < top_hz))


dry = scene()
out = record(dry)
materialize(out)
```